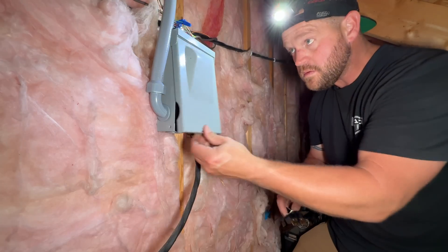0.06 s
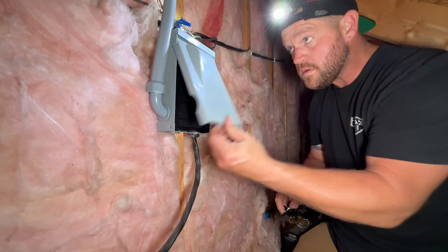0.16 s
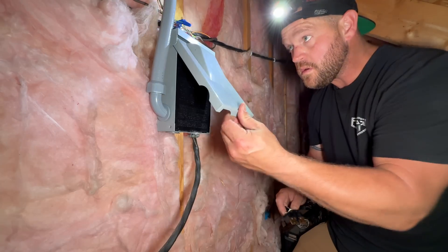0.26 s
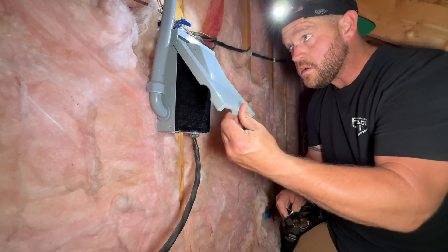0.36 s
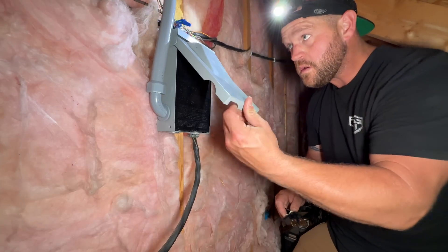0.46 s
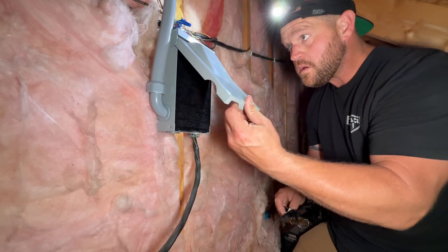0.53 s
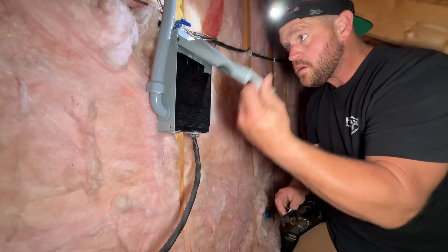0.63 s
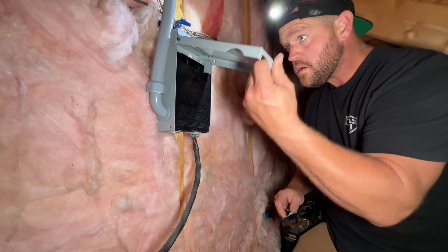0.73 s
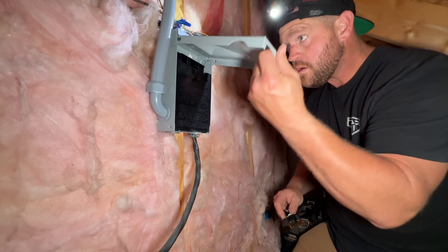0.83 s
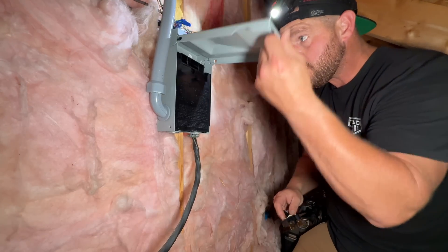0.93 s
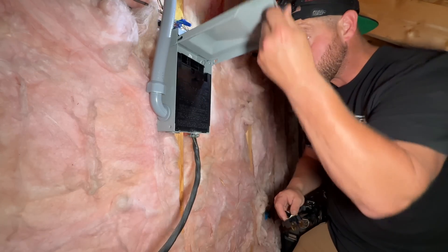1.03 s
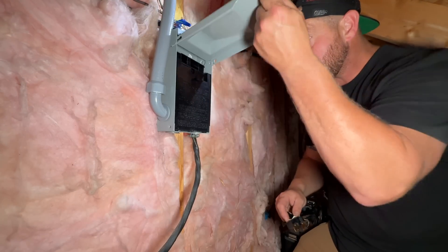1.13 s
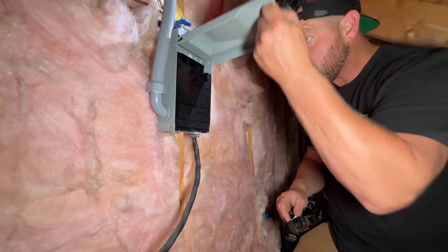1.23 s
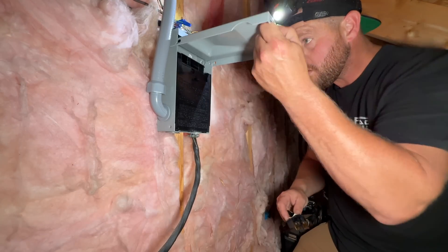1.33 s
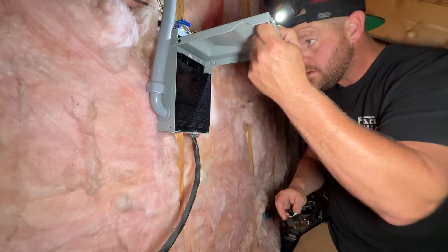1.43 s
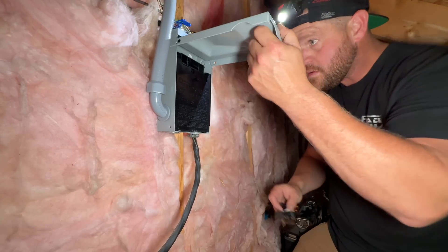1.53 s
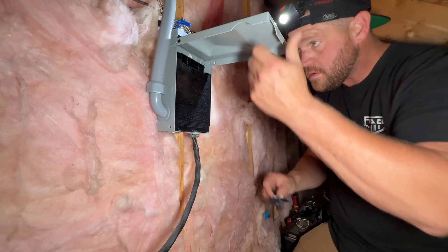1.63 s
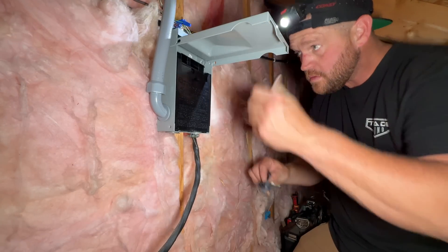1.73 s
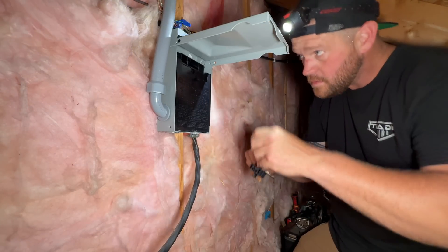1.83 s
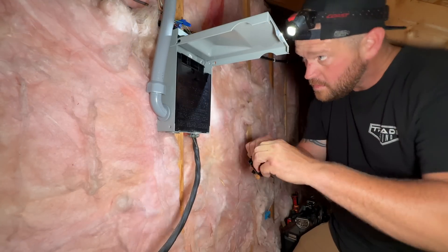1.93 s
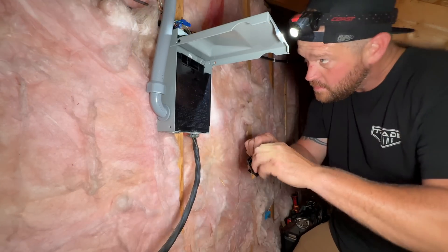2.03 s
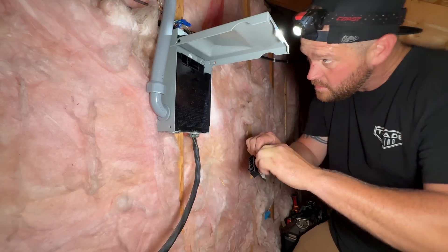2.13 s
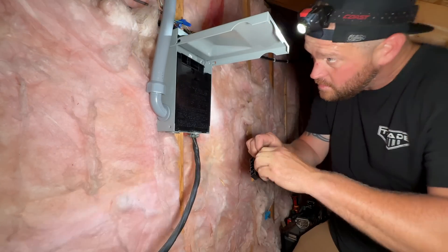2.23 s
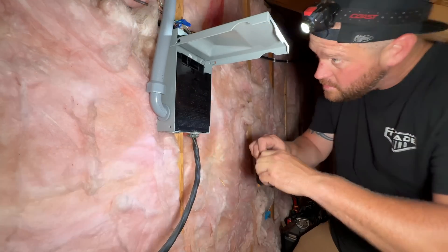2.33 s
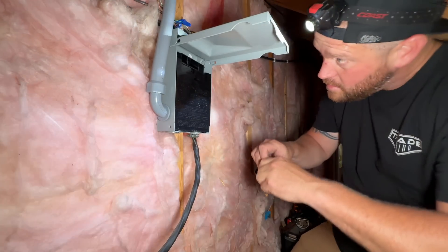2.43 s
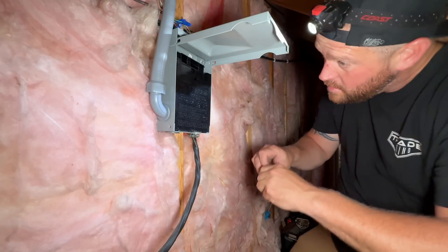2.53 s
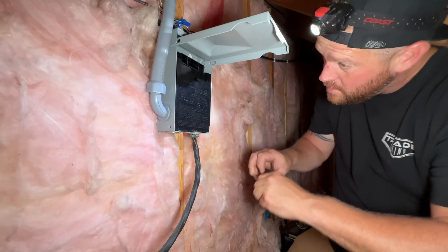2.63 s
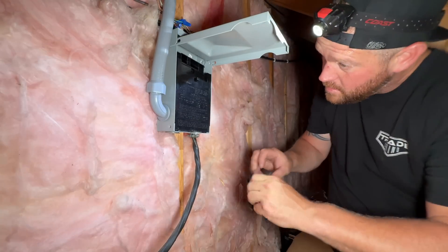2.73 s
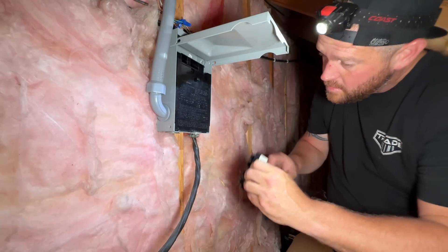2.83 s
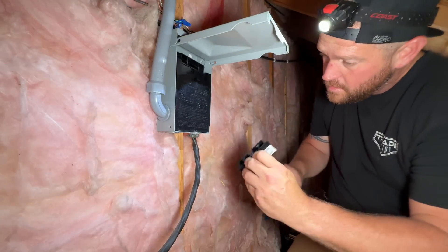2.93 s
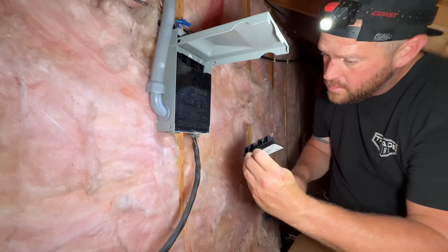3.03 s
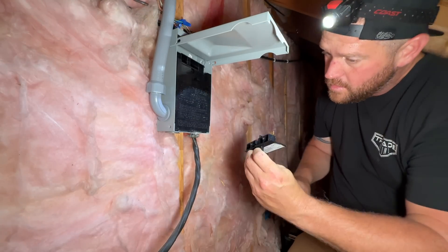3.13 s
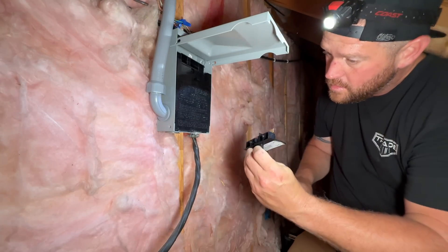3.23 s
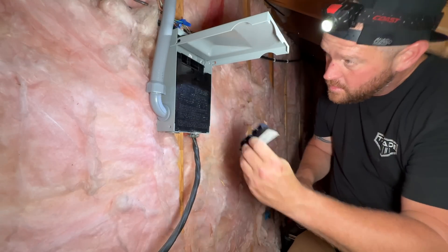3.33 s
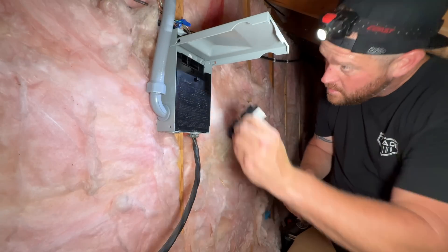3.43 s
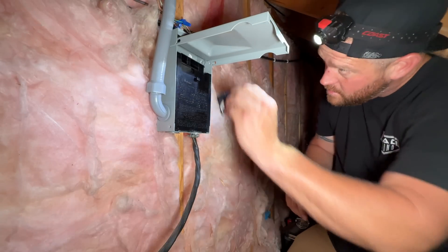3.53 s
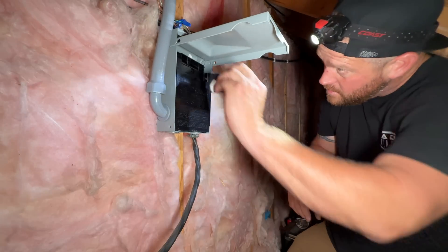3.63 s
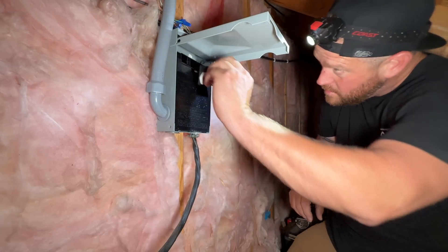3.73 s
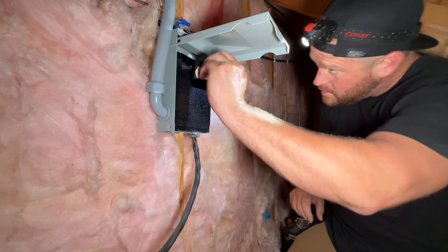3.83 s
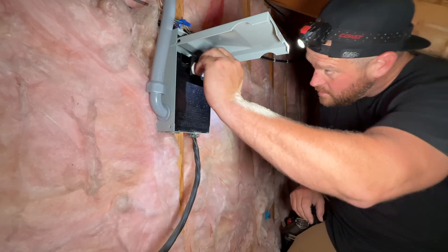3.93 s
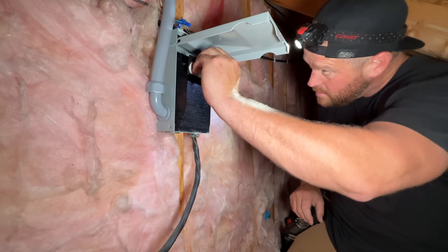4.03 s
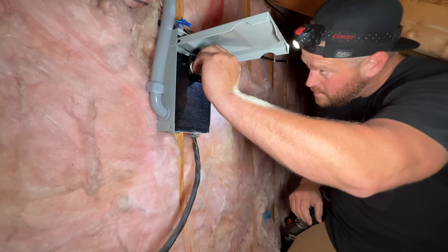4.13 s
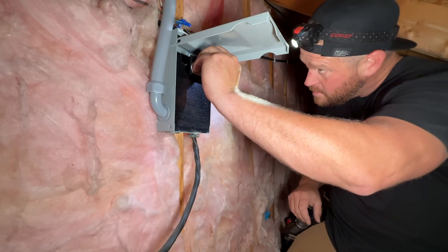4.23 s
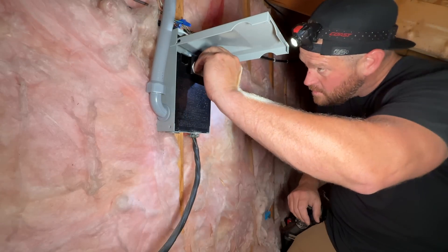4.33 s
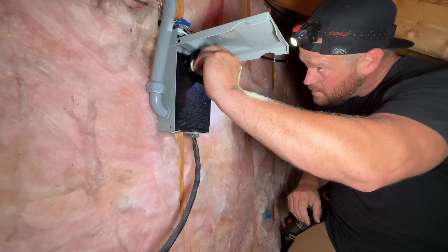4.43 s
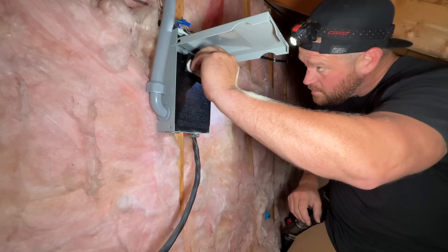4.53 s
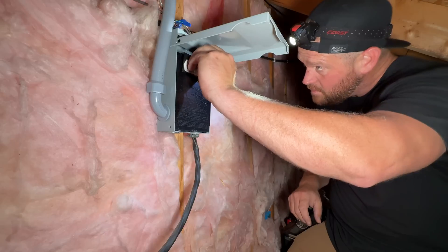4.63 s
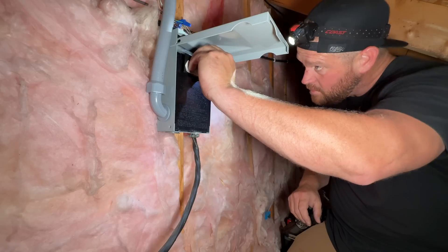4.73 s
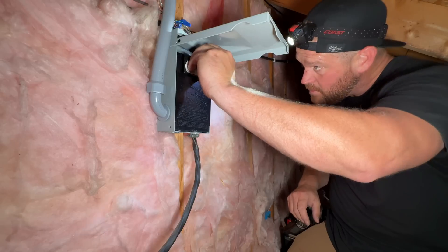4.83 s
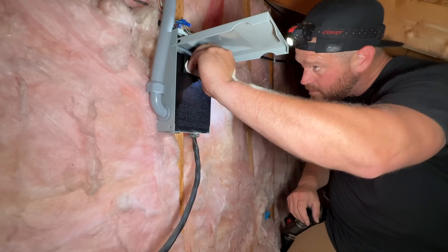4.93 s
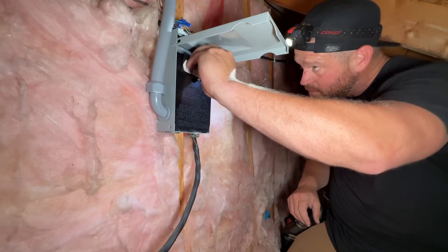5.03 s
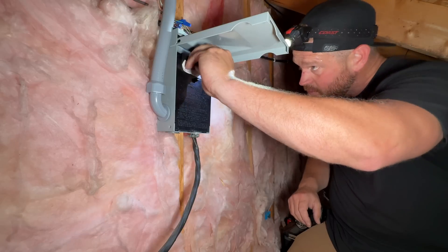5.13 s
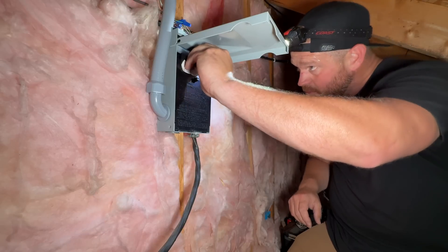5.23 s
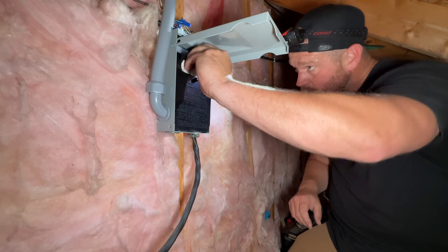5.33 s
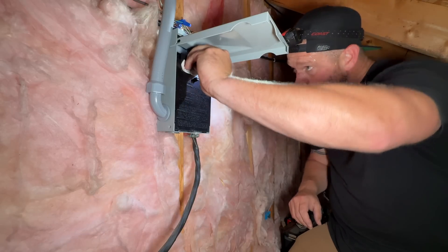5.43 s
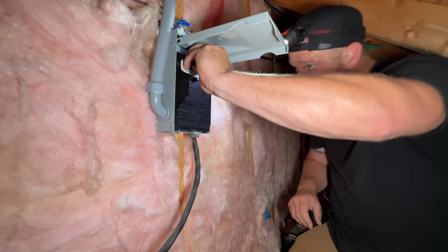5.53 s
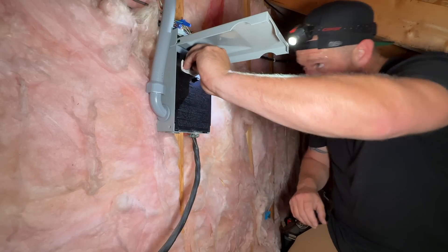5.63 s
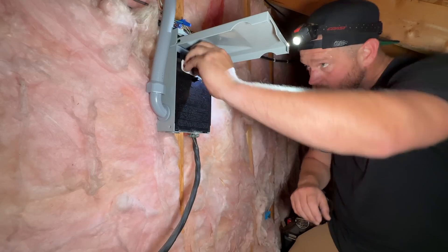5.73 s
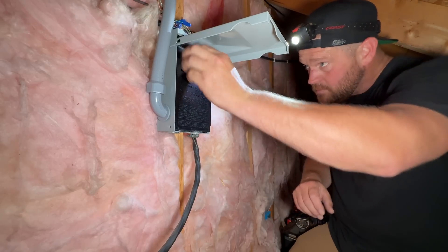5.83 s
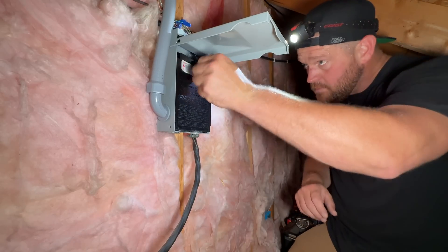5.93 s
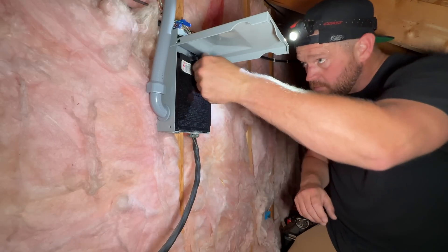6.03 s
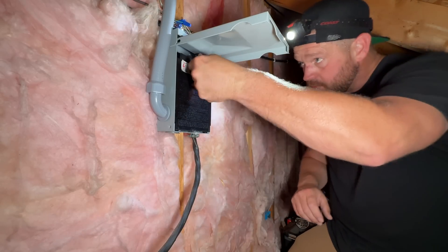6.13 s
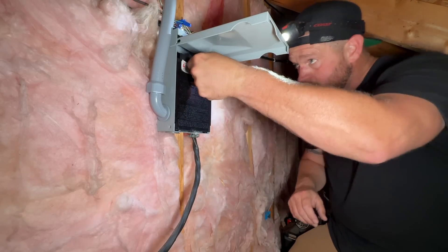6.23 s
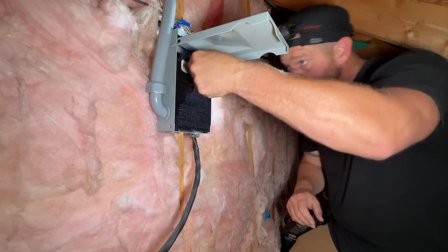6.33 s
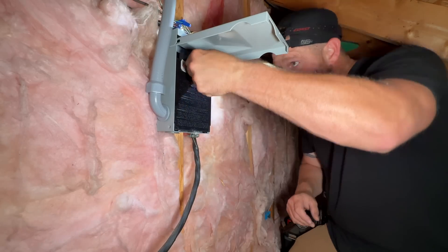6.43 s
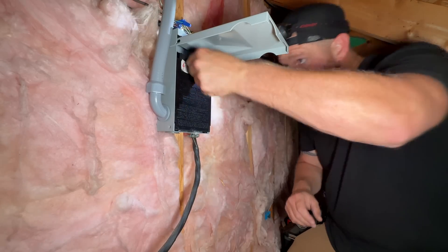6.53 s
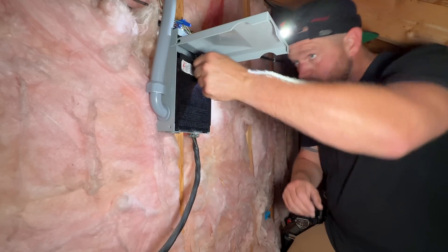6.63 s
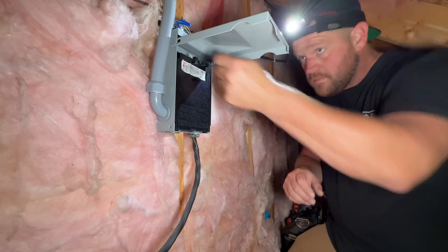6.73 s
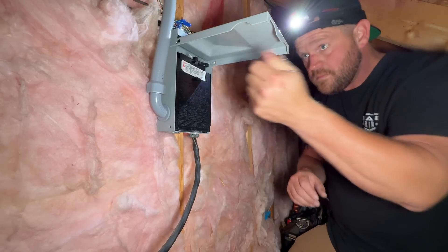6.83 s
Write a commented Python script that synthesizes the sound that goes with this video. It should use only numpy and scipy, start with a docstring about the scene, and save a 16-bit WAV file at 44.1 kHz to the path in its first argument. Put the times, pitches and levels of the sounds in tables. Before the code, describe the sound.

A close stereo microphone in a small, insulated, dry crawl space hears hands working on a sheet-metal electrical box. From 0 to 0.7 s the cover rattles lightly with low wall rumble, with small knocks around 0.6. The hinge gives a short rubbing squeak, and at 1.05 s the cover hits its stop with a loud, bright double clack and brief ring. Soft rumble and small taps follow; a deep hum swells at 1.6 and fades by 2. From 1.9 to 3.25 a plastic holder makes faint, high finger ticks, clearest at 3.0. Near silence lasts until 4.0. Then irregular clicks build, sharp at 4.58, strong at 4.97, clustered around 5.1, loudest at 5.52 with a thud and metallic ring. Low shaking and skin rubbing trail off; weak taps and scrapes continue to about 6.6, with a small snap at 6.47, over barely audible air.

```python
"""A rattle of contacts on sheet metal over a low shake of the wall opens the scene: hands work on a switch box in a
padded crawl space. The cover is swung up to its stop, a plastic fuse holder is turned over in the fingers, then
pushed into its slot. Each contact is a click in a dying swarm of noise and clicks, shaped by band filters, that
excites the modes of its part; pushes and grip excite the studs and a back panel. Skin rubs, the hinge sings, the
shell rings on. A deep tone swells once; still air and a faint drone lie far below."""
import sys
import numpy as np
from scipy import signal
from scipy.io import wavfile

SR = 44100
rng = np.random.default_rng(int(sys.argv[2]) if len(sys.argv) > 2 else 0)


def inscribe(sig):
    """Save sig as 16-bit PCM at rate SR to the path in sys.argv[1].

    A 1-D sig is mono; a 2-D sig holds one channel per row.
    Samples are clipped to [-1, 1] before scaling.
    """
    pcm = np.round(np.clip(np.atleast_2d(sig).T, -1, 1) * 32767)
    wavfile.write(sys.argv[1], SR, pcm.astype(np.int16))


N = 302967


def amp(db):
    """Level definition: 20 dB are a factor of ten in amplitude."""
    return 10 ** (np.asarray(db) / 20)


def rms_one(x):
    """Normalisation to unit effective value."""
    return x / np.sqrt(np.mean(x ** 2) + 1e-20)


def band(x, low_hz, high_hz):
    """Band-pass filtering between two edge frequencies."""
    return signal.sosfilt(signal.butter(2, [low_hz, high_hz], "band", fs=SR, output="sos"), x + 1e-18)


def drift(rate):
    """Slow random modulation: normal values of spread 1, drawn rate times a second and joined by lines."""
    knots = rng.standard_normal(int(N / SR * rate) + 2)
    return np.interp(np.arange(N) / SR * rate, np.arange(len(knots)), knots)


def ring(drive, hz, t60):
    """Damped resonator: its impulse response is a sine of initial height 1 that falls 60 dB in t60 seconds."""
    radius, omega = amp(-60 / (t60 * SR)), 2 * np.pi * hz / SR
    return signal.lfilter([0, np.sin(omega)], [1, -2 * radius * np.cos(omega), radius * radius], drive + 1e-18)


def coloured(white, spectrum):
    """Spectral shaping of noise in half-octave bands; neighbouring bands take unrelated noise."""
    hz, density_db = np.transpose(spectrum)
    edges = 10400 / 2 ** np.arange(6.5, -.1, -.5)
    bands = 0
    for k, (low, high) in enumerate(zip(edges, edges[1:])):
        band_db = np.interp(np.log(low * high) / 2, np.log(hz), density_db)
        bands = bands + amp(band_db) * band(white[k % 2], low, high)
    return rms_one(signal.sosfilt(signal.butter(8, edges[-1], fs=SR, output="sos"), bands))


# five noise bands, in the order middle, low, bright, high, very high: lower edge f/Hz, upper edge f/Hz
BANDS_HZ = [(800, 2500), (250, 800), (2500, 5500), (6800, 11800), (13800, 16300)]
# polarity of each band [+1 or -1]: neighbours of opposite sign add up at their common edge
BAND_SIGNS = [1, -1, -1, 1, -1]
# gain of the five bands for each dB of brightness [dB per dB]
BRIGHTNESS_SHARE = [0.042, 0.032, 1.2, 3.2, 6.6]
# each band's level rises with peak level, the two highest most: gain for each dB above STRENGTH_REF_DB [dB per dB]
STRENGTH_SHARE = [0.027, 0.012, 0.021, 0.14, 0.13]
STRENGTH_REF_DB = -33.5
OWN_DB = 12.5   # noise of each ear's own, against the noise both share
CHATTER_PER_S, CHATTER_SPREAD_DB = 250, 6   # stray sharp touches inside a rattle
RISE_MS, RATTLE_REF_S = 1.1, .06   # longest rise constant; rattles below the reference t60 rise faster
PITCH_WIDTH, PITCH_HASTE = .1, 0.85   # half bandwidth over frequency; decay rate of the pitch over the rattle's


def contacts(rows, modes, colour_db, rough_db, crack_db, ring_db, pitch_db):
    """Impact excitation: a click in a swelling, dying swarm is filtered in bands and drives damped modes."""
    t = np.arange(int(.2 * SR)) / SR
    rattles = np.zeros((len(BANDS_HZ), 2, N + len(t)))
    pitched = np.zeros((2, N + len(t)))
    mode_share_db = 4 * rng.standard_normal((len(rows), len(modes)))
    starts = []
    for s, peak_db, body_db, bright_db, t60, hz in rows:
        start = round(s * SR)
        starts.append(start)
        shared, left, right, lumps = rng.standard_normal((4, len(t)))
        chance, size = rng.random((2, len(t)))

        # each ear faces another side of the part
        swarm = shared + amp(OWN_DB) * np.array([left, right])
        rise_ms = np.clip(RISE_MS * t60 / RATTLE_REF_S, .05, RISE_MS)
        swarm *= amp(rough_db * np.repeat(lumps, 30)[:len(t)]) * (1 - np.exp(-1000 * t / rise_ms))
        swarm /= np.sqrt(np.mean(swarm[:, :900] ** 2))
        touch_db = crack_db - 10 - CHATTER_SPREAD_DB * np.log(size + .05)
        swarm += (chance < CHATTER_PER_S / SR) * np.sign(shared) * amp(touch_db)
        # the sharp edge lands just after the first touch
        swarm[:, round(2 * RISE_MS * SR / 1000)] = amp(crack_db)

        band_db = peak_db + np.array(colour_db) + [0, body_db, 0, 0, 0]
        band_db = band_db + bright_db * np.array(BRIGHTNESS_SHARE)
        band_db = band_db + (peak_db - STRENGTH_REF_DB) * np.array(STRENGTH_SHARE)
        colour = amp(band_db) * BAND_SIGNS
        rattles[..., start:start + len(t)] += colour[:, None, None] * swarm * amp(-60 * t / t60)

        # the pitch of the touched spot takes the level of the band it lies in
        middle_low, middle_high = BANDS_HZ[0]
        spot_db = body_db if hz < middle_low else bright_db if hz > middle_high else 0
        dying = swarm * amp(-60 * PITCH_HASTE * t / t60)
        spot = band(dying, hz * (1 - PITCH_WIDTH), hz * (1 + PITCH_WIDTH))
        spot_gain = amp(peak_db + spot_db + pitch_db) * np.sqrt(SR / 4 / PITCH_WIDTH / hz)
        pitched[:, start:start + len(t)] += spot_gain * spot

    # the root makes up for bandwidth, so that only the colour sets the power of a band
    rattle = sum(np.sqrt(SR / 2 / (high - low)) * band(part[:, :N], low, high)
                 for part, (low, high) in zip(rattles, BANDS_HZ))
    # every contact point excites the modes in its own proportions
    latest = np.clip(np.searchsorted(starts, np.arange(N), side="right") - 1, 0, None)
    drive = rattle.mean(axis=0)
    rung = sum(ring(drive * amp(db + ring_db + mode_share_db[latest, k]), hz, t60)
               for k, (hz, db, t60) in enumerate(modes))
    return rattle + pitched[:, :N] + rung


# contacts of the swinging cover: t/s, relative peak level of the middle band/dB, low band (body) against it
# level/dB, bright band (brightness) against it level/dB, rattle t60/s, pitch of the touched spot f/Hz
COVER_HITS = [(0.003, -52.5, 10, -27, 0.22, 670), (0.031, -49, 8, 1.5, 0.21, 626),
              (0.049, -36.5, -13, -2.5, 0.085, 1810), (0.087, -40.5, 1.5, -3, 0.13, 490),
              (0.141, -54.5, -20, 0.5, 0.58, 3970), (0.211, -42, 6, -2.5, 0.1, 605),
              (0.302, -46.5, 6, -1, 0.018, 407), (0.413, -57.5, 10.5, -1, 0.13, 615),
              (0.457, -47, -2, 2, 0.08, 523), (0.571, -49, -20, -7, 0.35, 940),
              (0.612, -27.5, -5, -4.5, 0.088, 1035), (0.665, -49, 1, 0, 0.18, 545),
              (0.677, -32.5, -7, -23, 0.056, 1190), (1.051, -9.5, -4.5, -2, 0.08, 2530),
              (1.056, -9, -6.5, -16, 0.075, 1174), (1.195, -53, 10, -1.5, 0.087, 503),
              (1.255, -53, 3.5, -2.5, 0.3, 606), (1.293, -46.5, 7, -7, 0.082, 1240),
              (1.36, -59.5, -29, -4, 0.25, 1153), (1.444, -41.5, -36, -12.5, 0.05, 2130),
              (1.515, -51, -39, -2, 0.045, 3860), (1.561, -52.5, -5, -2.5, 0.1, 1670)]
# bending modes of the cover: f/Hz, relative level/dB, t60/s
COVER_MODES = [(287, -5.5, 0.02), (537.2, -20.5, 0.041), (645, -17.5, 0.067), (1224, -14, 0.1),
               (1800, -18, 0.098)]
# colour of the cover in the five bands at body and brightness 0 [level/dB]
COVER_COLOUR_DB = [2, 7, 6.5, 2, -5.5]


def cover_contacts():
    """Plate vibration: knocks excite the short, low modes of the metal cover up to its stop."""
    return contacts(COVER_HITS, COVER_MODES, COVER_COLOUR_DB,
                    rough_db=2.0, crack_db=18.0, ring_db=-31.0, pitch_db=-0.5)


# low modes of the wall frame: f/Hz, relative level/dB, t60/s under a blow
STUD_MODES = [(48.94, 10, 0.18), (73.5, 16, 0.075), (88.84, 13.5, 0.079), (123, 5, 0.2), (166, 6.5, 0.11),
              (203, -11.5, 0.15), (257, -9.5, 0.017), (382.7, -13.5, 0.042)]
# heavy pushes into the wall: t/s, relative level/dB, contact time/ms
THUMPS = [(0.002, -42, 1.7), (0.089, -41, 4.6), (0.14, -41.5, 1.9), (0.213, -38.5, 0.84),
          (0.625, -34, 0.99), (1.064, -14.5, 0.72), (1.212, -29.5, 8.4), (1.303, -38, 2.2),
          (1.595, -45, 10), (2.558, -36, 9.2), (4.042, -44.5, 9.5), (4.362, -38, 7.5), (4.522, -45, 3.6),
          (4.587, -40, 0.37), (4.977, -37, 1.7), (5.121, -29.5, 0.17), (5.152, -24.5, 9.1),
          (5.458, -29.5, 8.8), (5.522, -20, 0.73), (6.065, -40, 10.6), (6.429, -47, 1.5)]


def studs(shake_db):
    """Forced and free vibration: lumpy grip noise shakes the frame, soft pushes set its modes ringing."""
    blows = np.zeros((len(STUD_MODES), N))
    # each push loads the modes in its own way
    share_db = 2.5 * rng.standard_normal((len(THUMPS), len(STUD_MODES)))
    for (s, db, contact_ms), shares in zip(THUMPS, share_db):
        push = np.hanning(int(contact_ms * SR / 1000) + 3)
        blows[:, round(s * SR):][:, :len(push)] += amp(db + shares)[:, None] * push / push.sum()
    grip = rng.standard_normal(N) * amp(5.5 * drift(25))
    # under the grip the modes ring longer and lose 0.12 dB per Hz
    shaken = sum(amp(db - 0.12 * hz) * rms_one(ring(grip, hz, 1.8 * t60)) for hz, db, t60 in STUD_MODES)
    struck = sum(amp(db) * ring(blows[k], hz, t60) * (-1) ** k for k, (hz, db, t60) in enumerate(STUD_MODES))
    return amp(shake_db) * rms_one(shaken) + struck


def sway():
    """Amplitude modulation: a faint 50 Hz tone swells as the released cover quivers on its hinge, then sinks."""
    start_s, rise_s, fall_s = 1.59, 0.031, 0.42
    t = np.arange(N) / SR
    knots_s = start_s + np.cumsum([0, rise_s, fall_s, rise_s])
    # the first and last values hold before and after the swell
    swell = np.interp(t, knots_s, [0.2, 0.89, 0.027, 0.056])
    return amp(-40.5) * swell * np.sin(2 * np.pi * 50 * (t - start_s))


# spectrum of skin on the parts: f/Hz, relative density level/dB per Hz
RUB = [(120, -36), (200, -22), (705, -10), (1180, -6), (1390, -9.5), (1720, -12), (2140, -15), (10500, -24)]


def rubbing(rub_db):
    """Sliding friction: patches of fine noise with stray slips that die away within milliseconds."""
    slip_db = 3.2 * np.minimum(rng.exponential(1, N), 4)
    slips = (rng.random(N) < 200 / SR) * amp(slip_db)   # 200 a second on average
    dying_slips = signal.lfilter([.9], [1, -np.exp(-1 / (.006 * SR))], slips)   # time constant 6 ms
    patches = amp(3.0 * drift(40)) + dying_slips
    return amp(rub_db) * coloured(rng.standard_normal((2, N)) * patches, RUB)


def panel(shake_db):
    """Structure-borne sound: the back panel rumbles with the shaken wall and dies away after each push."""
    mean_db, kick_db, t60_s = -77, -21, .26
    lumps = rng.standard_normal(N) * amp(5.0 * drift(51))
    kicks = np.zeros(N)
    for s, db, contact_ms in THUMPS:
        kicks[round(s * SR)] = amp(db + kick_db) / contact_ms   # shorter contacts kick harder
    dying = signal.lfilter([1], [1, -amp(-60 / (t60_s * SR))], kicks + 1e-18)
    shaken = amp(mean_db + shake_db - shake_db.mean())
    return (shaken + dying) * rms_one(band(lumps, 190, 659.5))


# spectrum of the still air: f/Hz, relative density level/dB per Hz
AIR = [(88, -44.5), (150, -9.5), (856, -26), (1490, -8.5), (2280, -6.5), (4090, -5.5), (9780, -7.5)]
# airy bands of the drone: f/Hz, relative level/dB, t60/s
DRONE_BANDS = [(440, -11.5, 0.016), (1320, -7.5, 0.013)]
# swells of the drone: start t/s, length t/s, level added at the top/dB
DRONE_SWELLS = [(3.33, 0.27, -68), (3.631, 0.32, -71)]


def background():
    """Uncorrelated noise fields: still air differs in the two ears; the drone is a hum with resonant noise."""
    hum_hz, air_db, drone_db, swell_rise_s = 123.5, -77.5, -79, 0.1
    t = np.arange(N) / SR
    air = amp(air_db + drift(40)) * coloured(rng.standard_normal((2, 2, N)), AIR)
    white = rng.standard_normal((2, N))
    airy = sum(amp(db) * rms_one(ring(white, hz, t60)) for hz, db, t60 in DRONE_BANDS)
    ear_phase = np.array([[0], [.7]])   # rad
    hum = amp(2.0 * drift(4.9)) * np.sin(2 * np.pi * hum_hz * t + ear_phase)
    swells = sum(amp(db) * np.interp(t - s, [0, swell_rise_s, length], [0, 1, 0]) ** .5
                 for s, length, db in DRONE_SWELLS)
    return air + (amp(drone_db) + swells) * (hum + airy)


# friction in the hinge while the cover swings up: t/s, relative level/dB
HINGE = [(.70, -74), (0.789, -71.5), (0.951, -58), (1.044, -43), (1.102, -66), (1.35, -66), (1.45, -98)]
# tones the hinge sings through the cover: f/Hz, relative level/dB, t60/s
HINGE_TONES = [(1156, -1.5, 0.063), (1683, -8, 0.03)]


def hinge():
    """Friction-excited resonance: uneven rubbing noise in the hinge sings through the cover."""
    friction = rng.standard_normal(N) * amp(1.9 * drift(59))
    sung = sum(amp(db) * rms_one(ring(friction, hz, t60)) for hz, db, t60 in HINGE_TONES)
    s, db = np.transpose(HINGE)
    return sung * amp(np.interp(np.arange(N) / SR, s, db, left=-120, right=-120))


# modes of the steel shell: f/Hz, relative level/dB, t60/s
SHELL_MODES = [(947, 0, .3), (1750, 0, .3), (2659, -3, .3), (3305, -7, .3)]
# blows after which the shell sings on: t/s, relative level/dB, favoured pitch f/Hz
SHELL_BLOWS = [(1.058, -41, 1750), (1.565, -53, 2400), (4.358, -51, 1800), (4.579, -48, 2300),
               (5.137, -44, 2660), (5.527, -30, 2050)]


def shell():
    """Modal impulse response: one click a blow, strongest in the modes near its favoured pitch."""
    fall_db = 20   # lost for each octave between mode and favoured pitch
    s, blow_db, favoured_hz = np.transpose(SHELL_BLOWS)
    share_db = 2 * rng.standard_normal((len(s), len(SHELL_MODES)))
    out = 0
    for k, (hz, db, t60) in enumerate(SHELL_MODES):
        octaves_off = np.abs(np.log2(hz / favoured_hz))
        clicks = np.zeros(N)
        clicks[np.round(s * SR).astype(int)] = amp(blow_db + db + share_db[:, k] - fall_db * octaves_off)
        out = out + ring(clicks, hz, t60)
    return out


# ticks of the holder in the fingers: t/s, relative peak level of the middle band/dB, low band against it
# level/dB, bright band against it level/dB, rattle t60/s, pitch of the touched spot f/Hz
FINGER_TICKS = [(1.885, -51.5, -44, -1.5, 0.085, 3530), (2.055, -62.5, -8, 5, 0.09, 5600),
                (2.359, -62, 3.5, 2, 0.18, 2430), (2.544, -57.5, -2, -8, 0.25, 4420),
                (2.582, -57, -3, 3, 0.1, 1700), (2.608, -47, -17, -2.5, 0.039, 3390),
                (2.655, -49.5, -9, -3.5, 0.089, 4500), (2.756, -59, -20.5, -3, 0.032, 2340),
                (2.915, -44.5, -20, -1, 0.07, 3120), (2.943, -51.5, -18, -7.5, 0.17, 3230),
                (2.99, -35, -33, -9.5, 0.081, 3520), (3.039, -46, -31, -6, 0.063, 4020),
                (3.252, -62, -12, 5.5, 0.048, 2657)]
# modes of the plastic fuse holder: f/Hz, relative level/dB, t60/s
HOLDER_MODES = [(2580, -2.5, 0.026), (3950, -34, 0.075)]
# colour of the holder in the five bands at body and brightness 0 [level/dB]
HOLDER_COLOUR_DB = [-3.5, 9, 11.5, 7.5, -36]


def finger_ticks():
    """Small-body resonance: the light plastic holder answers finger contacts with high, short modes."""
    return contacts(FINGER_TICKS, HOLDER_MODES, HOLDER_COLOUR_DB,
                    rough_db=4.5, crack_db=17.0, ring_db=-28, pitch_db=11.5)


# contacts of the holder with its slot: t/s, relative peak level of the middle band/dB, low band against it
# level/dB, bright band against it level/dB, rattle t60/s, pitch of the touched spot f/Hz
SLOT_HITS = [(4.034, -38, -9.5, -6, 0.069, 938), (4.12, -54.5, -4, 1, 0.038, 1734),
             (4.169, -49, 3, -0.5, 0.076, 1000), (4.187, -46.5, -6, -0.5, 0.1, 2060),
             (4.213, -42.5, -3, -22, 0.077, 612), (4.338, -38, -7, -2, 0.13, 1590),
             (4.357, -32, -12, -3.5, 0.067, 1517), (4.508, -30, -21, -1.5, 0.075, 2130),
             (4.544, -45, -54, 3, 0.09, 4030), (4.577, -18, -12, -1, 0.054, 3100),
             (4.629, -38, -25, -4, 0.13, 2150), (4.649, -33.5, -4, -4.5, 0.06, 2120),
             (4.727, -42, -6, -12, 0.078, 1640), (4.803, -29.5, -18.5, -8, 0.079, 1052),
             (4.931, -46, -8.5, -4.5, 0.43, 3580), (4.961, -18.5, -4.5, -2.5, 0.067, 4110),
             (4.966, -13, -14.5, -2, 0.089, 1970), (5.033, -38, -12, -6, 0.38, 920),
             (5.085, -18, -13, -3, 0.073, 1000), (5.106, -17.5, -24, -2.5, 0.1, 4860),
             (5.131, -16, -37, -0.5, 0.017, 4700), (5.136, -18, -11, -3, 0.085, 4600),
             (5.254, -27.5, -8, -10.5, 0.016, 970), (5.309, -45, -17, -24, 0.1, 530),
             (5.332, -39.5, -17, -22.5, 0.19, 920), (5.402, -24, -9.5, -6, 0.088, 903),
             (5.442, -33, -14, -10, 0.17, 570), (5.459, -39.5, -20, -1.5, 0.039, 1250),
             (5.509, -11.5, -3, -6.5, 0.021, 636), (5.522, -10.5, -1.5, -0.5, 0.059, 1592),
             (5.732, -51, -8, -10, 0.18, 1390), (5.777, -43.5, -11.5, -2, 0.11, 1190),
             (6.001, -42, -18, -17, 0.037, 1180), (6.076, -49.5, -10, -9.5, 0.14, 1120),
             (6.127, -46.5, -1, 0.5, 0.11, 1032), (6.345, -53, -6.5, -19, 0.23, 1016),
             (6.382, -51.5, 6, -3, 0.14, 925), (6.413, -48.5, 4.5, 0, 0.083, 896),
             (6.474, -34.5, -13, -0.5, 0.0088, 1750), (6.549, -49.5, -21, -16, 0.08, 1320),
             (6.57, -48, 9.5, 3, 0.022, 1215), (6.624, -47.5, -1, -0.5, 0.062, 1226)]
# modes of the sheet-metal box: f/Hz, relative level/dB, t60/s
BOX_MODES = [(622, -26, 0.081), (933, -27, 0.13), (1516.7, -24, 0.078), (1934, -30, 0.027),
             (2127, -27.5, 0.061), (2633, -26, 0.036), (4520, -22.5, 0.036)]
# colour of the box in the five bands at body and brightness 0 [level/dB]
BOX_COLOUR_DB = [1, 0, 3, -3.5, -6]


def slot_contacts():
    """Coupled impact: pushing the holder into its slot excites the modes of the whole box."""
    return contacts(SLOT_HITS, BOX_MODES, BOX_COLOUR_DB,
                    rough_db=5.0, crack_db=15.5, ring_db=-13, pitch_db=2.0)


# scatter from boards close by, one row an ear: three delays t/ms
SCATTER_MS = [
    [.18, .5, 1.3],
    [.29, .75, .95],
]


def near_walls(x):
    """All-pass diffusion: boards smear sound over milliseconds, unlike in each ear, without colouring it."""
    ears = []
    for heard, delays_ms in zip(x, SCATTER_MS):
        for lag in np.round(np.array(delays_ms) * SR / 1000).astype(int):
            taps = np.zeros(lag + 1)
            taps[0], taps[-1] = 1, -.5
            heard = signal.lfilter(taps[::-1], taps, heard)
        ears.append(heard)
    return np.array(ears) * amp([[0.63], [-0.63]])   # the left ear is slightly louder


# handling by the hands: t/s, shaking of the studs relative level/dB, rubbing of skin relative level/dB
HANDLING = [(0.0, -32.5, -52.5), (0.44, -39.5, -75.5), (1.008, -44, -56.5), (1.18, -31, -68.5),
            (1.38, -44.5, -69.5), (1.62, -53.5, -73), (2.09, -71, -91), (2.348, -66, -70.5),
            (2.618, -51.5, -62), (2.891, -64, -69), (3.042, -72.5, -85), (4.06, -63.5, -84),
            (4.251, -48, -70), (4.442, -56, -93), (4.549, -38.5, -58.5), (4.95, -51.5, -72.5),
            (5.193, -39.5, -67.5), (5.593, -28, -57), (5.83, -54.5, -76), (6.139, -56, -74),
            (6.472, -40.5, -63.5), (6.87, -59.5, -72)]


def scene():
    """Superposition: scattered parts, the wall frame and the background add up at the two ears."""
    s, *columns = np.transpose(HANDLING)
    shake_db, rub_db = [np.interp(np.arange(N) / SR, s, column) for column in columns]
    parts = cover_contacts() + finger_ticks() + slot_contacts()
    frame = studs(shake_db) + sway()
    # the upper wall modes reach the ears in opposite polarity, 60 samples late
    lean = amp(-4.0) * band(band(frame, 140, 400), 140, 400) * [[1], [-1]]
    late_lean = np.roll(lean, 60, axis=1)
    near = amp(-10.0) * parts + rubbing(rub_db) + panel(shake_db) + hinge() + shell()
    return near_walls(near) + frame + late_lean + background()


def record(dry):
    """Transducer response: deep bass drops, a hollow lies near the top, peaks are rounded, the top is cut."""
    heard = signal.sosfilt(signal.butter(4, 39, "high", fs=SR, output="sos"), dry)
    hollow = signal.sosfilt(signal.butter(2, [11900, 13800], "bandstop", fs=SR, output="sos"), heard)
    rounded = np.tanh(hollow + amp(-25.5) * heard)   # a little sound still fills the hollow
    return signal.sosfilt(signal.cheby2(12, 70, 17000, fs=SR, output="sos"), rounded)


dry = scene()
out = record(dry)
inscribe(out)
```